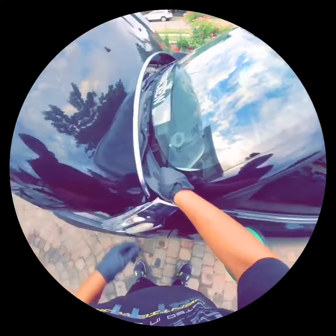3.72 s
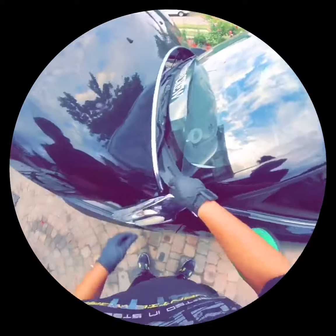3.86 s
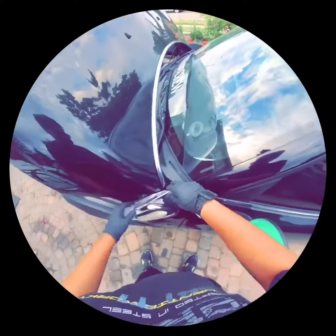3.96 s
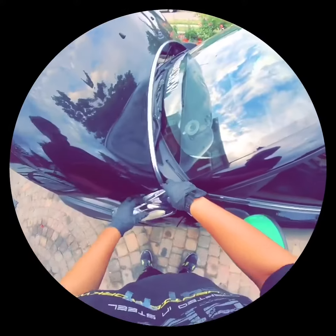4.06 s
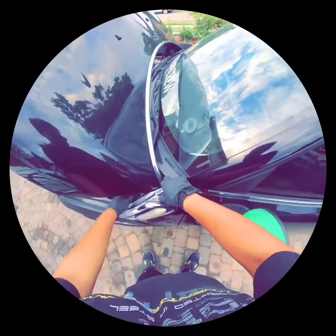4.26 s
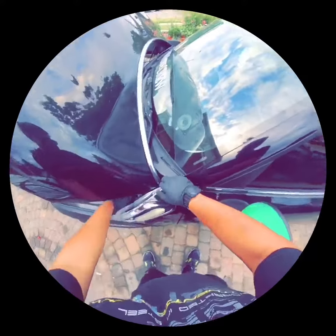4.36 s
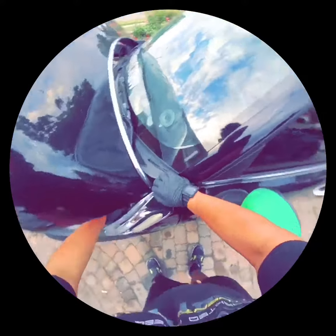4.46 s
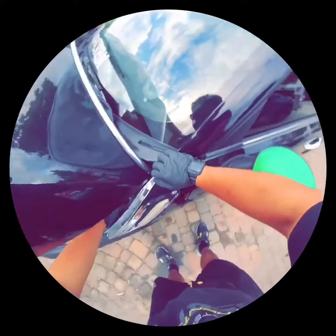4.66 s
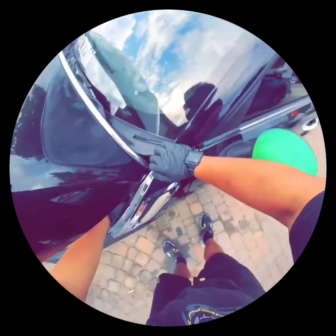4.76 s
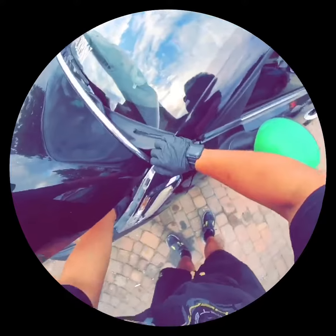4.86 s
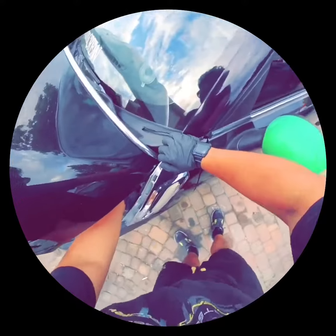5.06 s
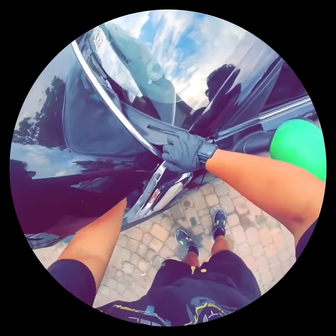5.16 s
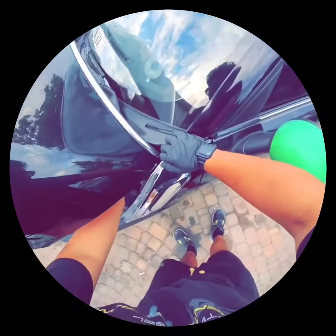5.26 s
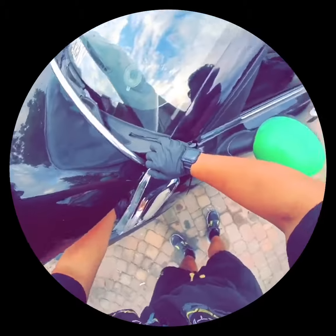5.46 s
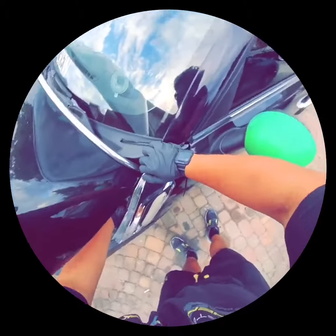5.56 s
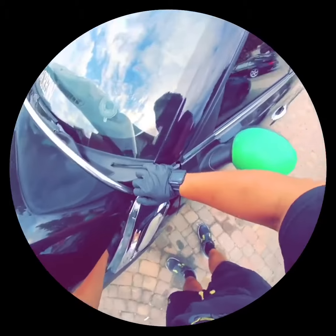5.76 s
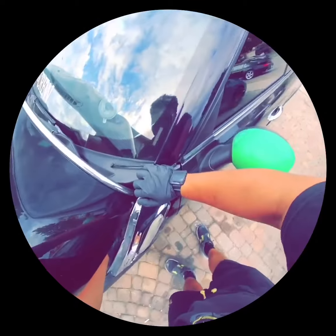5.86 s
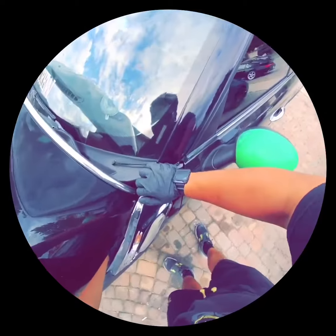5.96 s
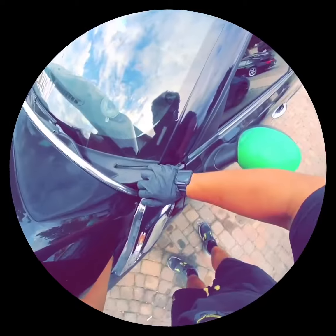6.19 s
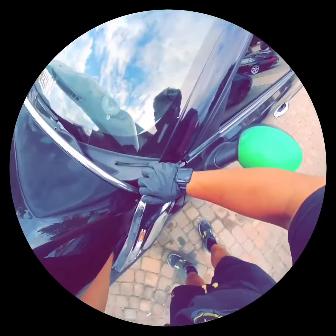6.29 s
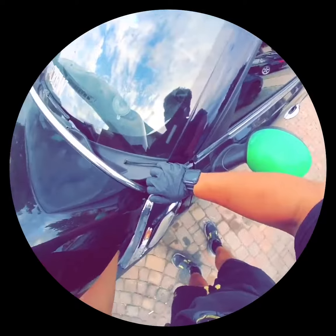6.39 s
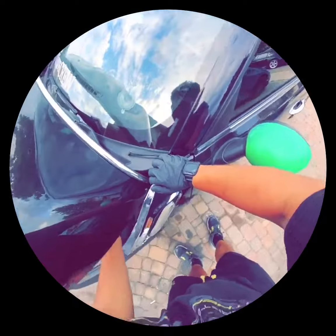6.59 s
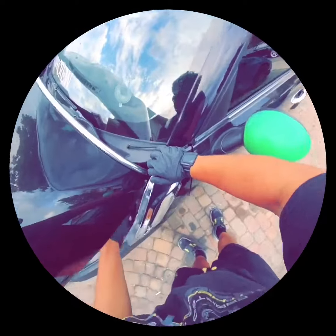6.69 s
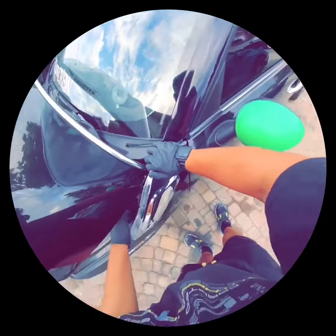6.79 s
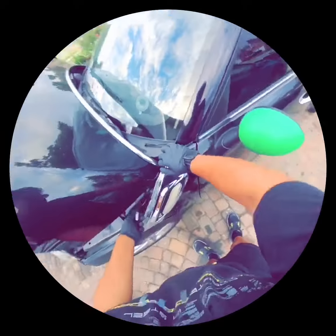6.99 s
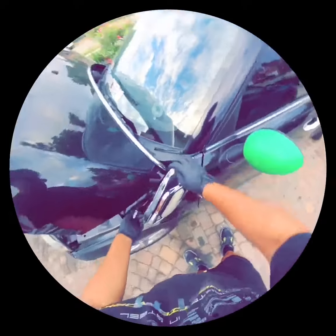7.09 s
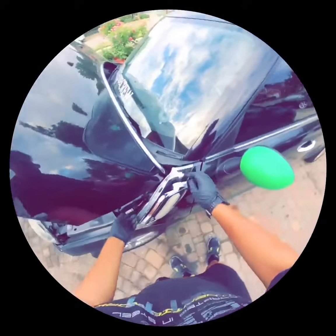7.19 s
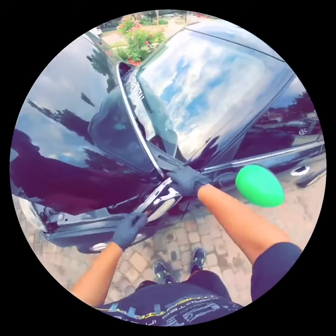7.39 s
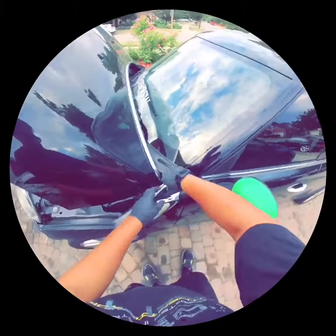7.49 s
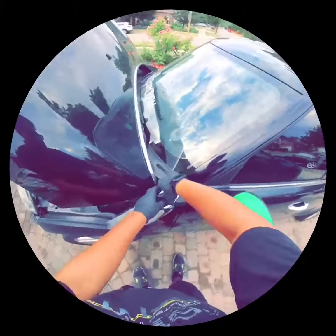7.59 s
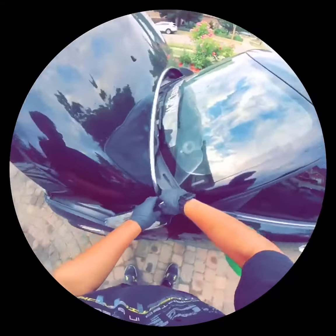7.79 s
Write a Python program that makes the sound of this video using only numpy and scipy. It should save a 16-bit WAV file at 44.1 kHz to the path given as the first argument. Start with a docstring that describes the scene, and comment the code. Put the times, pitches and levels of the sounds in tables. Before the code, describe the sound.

A fine water spray hisses outdoors for three seconds, cuts dead, then plastic car trim creaks, snaps and ticks over a faint airy rush.

```python
"""Outdoors beside a car, a fine water spray hisses for three seconds and breaks off into a moment of silence.
Then hands work plastic trim loose at the foot of the windscreen: it creaks, clips snap, the panel thumps.
Water is shaped noise and random impacts; the trim is a bank of decaying modes struck by clicks and slips.
Glove, sleeve and trim edge add friction noise; behind lie a faint hum and a rush that swells at the end.
The microphone is worn on the body; its housing cuts narrow dips."""
import sys
import numpy as np
from scipy import signal
from scipy.fft import rfft, irfft, next_fast_len
from scipy.io import wavfile

SR = 44100
rng = np.random.default_rng(int(sys.argv[2]) if len(sys.argv) > 2 else 0)


def generate_wav(sig):
    """Save sig (samples, or channels by samples) to the path in sys.argv[1] as 16-bit PCM at SR."""
    pcm = np.round(np.clip(np.atleast_2d(sig).T, -1, 1) * 32767).astype(np.int16)
    wavfile.write(sys.argv[1], SR, pcm)


N = 345289
TIME = np.arange(N) / SR
SPRAY_STOP_S, RESUME_S = 3.005, 3.147

# Water spray, before the offsets below: start_s, jet_above_edge_db, jet_below_edge_re_above_db, splash_db
SPRAY_LEVELS = [(0.0, -48.5, -1, -53), (0.08, -50, -1, -56), (0.15, -47, -1.5, -56.5),
                (0.21, -50.5, -3, -56.5), (0.26, -46, -9, -55), (0.33, -48, -3.5, -56),
                (0.45, -50, 1.5, -57.5), (0.51, -50.5, 1, -52), (0.55, -53.5, 6.5, -55.5),
                (0.7, -49.5, -3, -58), (0.76, -46, -5, -55.5), (0.83, -47.5, -2.5, -55.5),
                (0.95, -49, -4, -56), (1.1, -48.5, -2.5, -56.5), (1.25, -47.5, -5.5, -56),
                (1.35, -46.5, -7, -55), (1.72, -47, -6, -54.5), (1.8, -52, -1.5, -60), (1.91, -51, -3, -54),
                (1.97, -47, -4.5, -55.5), (2.3, -48.5, -4.5, -55.5), (2.45, -47, -3.5, -55.5),
                (2.86, -50, -1.5, -55), (2.93, -50, -1, -49.5), (2.98, -52, 2, -55)]
JET_EDGE_HZ = 4010
JET_OFFSET_DB, JET_BELOW_EDGE_OFFSET_DB = -1.5, 1.15
# Brief spurts from the nozzle: centre_s, half_length_s, jet_db, splash_db
NOZZLE_SPURTS = [(0.795, .01, -45.5, -62), (1.304, .008, -46.5, -62), (1.572, 0.0034, -42, -66),
                 (1.967, .005, -55, -48.5)]
# Fine mist off the nozzle, before its offset and sweep: start_s, level_db
MIST_LEVELS = [(0.0, -56), (0.18, -58), (0.29, -53.5), (1.16, -52.5), (1.18, -54.5), (1.68, -50),
               (1.79, -58.5), (1.84, -49), (1.86, -58), (2.05, -50)]
MIST_OFFSET_DB = -0.5
# The mist swells and fades evenly towards the end, as from a nozzle swept to and fro
SWEEP_START_S, SWEEP_PERIOD_S, SWEEP_DEPTH_DB = 2.075, 0.1676, 7.5
# The jet moves onto hollow bodywork and drums on it more strongly
DRUM_START_S, DRUM_RISE_S, DRUM_BEFORE_DB, DRUM_DB = 2.1, 0.27, -74, -64
# Spectra of splash, jet, mist and drumming: frequency_hz, density_db_per_hz
SPLASH_SPECTRUM = [(25, -53.5), (70, -30.5), (110, -13.5), (150, -8), (210, -3), (310, 1.5), (390, -0.5),
                   (500, 1.5), (1250, 3), (2000, -0.5), (2800, -18.5), (5000, -34)]
JET_SPECTRUM = [(200, -70.5), (1200, -43), (2300, -11.5), (3100, -5), (3900, -1.5), (4500, 2.5), (5200, -2),
                (6000, -10), (7000, -24), (9000, -21), (10600, -19.5), (11400, -31.5), (16000, -43)]
MIST_SPECTRUM = [(9000, -14.5), (11400, -15.5), (12100, 1), (13500, 3), (15700, 9), (17000, -17)]
DRUM_SPECTRUM = [(60, -32), (110, -20), (145, -0.5), (190, -9.5), (250, -4.5), (310, 2), (380, -8),
                 (900, -25.5), (4000, -63)]
# Borders of the bands of jet and high rush that flicker independently: border_hz
FLICKER_BORDERS_HZ = [3100, 3900, 4800]

# Modes of trim and panel, before tuning and focus: pitch_hz, level_db, t60_s
MODES = [(379, -8.5, 0.042), (437, 3, 0.042), (486, -8.5, 0.046), (723, -8.5, 0.021), (890, -13, 0.022),
         (1145, 0.5, 0.019), (1348, 1.5, .013), (1608, 2.5, 0.014), (2033, -1, 0.019), (2410, -0.5, 0.011),
         (2860, 1.5, .0047), (3240, -3, 0.011), (3590, 0, .006), (4590, 2.5, 0.013), (4830, 2.5, 0.011),
         (5280, 2.5, 0.0073), (5850, 0.5, 0.00555), (7740, 0, 0.0015), (8720, 0, 0.0046), (9180, -1, .004),
         (12480, 4.5, 0.0027), (15000, 5, .003)]
# Borders between the registers thump, panel, crack, tick and edge: border_hz
REGISTER_BORDERS_HZ = [900, 2000, 7000, 10500]
# Clips snapping, register levels before the trim's bass loss: start_s, ring_hz, ring_db, ring_t60_s,
# tuning_ratio, chatter_swell_s, chatter_re_click_db, thump_db, panel_db, crack_db, tick_db, edge_db
CLIP_SNAPS = [(3.54, 4790, -4.5, 0.09, 1.024, .001, -15, -26, -26.3, -27, -35, -44),
              (3.8158, 2954, -18, 0.0045, 1.02, 0.00067, -9, -31.5, -39, -27, -66, -58),
              (6.2633, 3790, 5.5, 0.0085, 1.203, 0.0014, -3, -42, -42, -36, -39.5, -29.5),
              (6.7672, 5350, 7, 0.014, 1.14, .001, 1, -60, -56, -41.5, -69, -69),
              (6.7862, 5530, -4, 0.0074, 1.4, 0.0018, -7, -55, -57, -34, -55, -49),
              (6.816, 5540, 2, .02, 1.2, 0.0018, -2, -59, -49, -40.5, -70, -72),
              (6.8406, 5350, 8, .016, 1.2, 0.0024, -5, -58, -57, -37.5, -57.5, -53)]
# Light taps just before and after the second snap, before the trim's bass loss:
# start_s, thump_db, panel_db, crack_db, tick_and_edge_db
LIGHT_TAPS = [(3.8141, -60, -43, -44, -88), (3.831, -39, -44, -47, -92), (3.8453, -69, -64, -64, -84),
              (3.848, -57, -49, -59, -90), (3.86, -49.5, -46, -51, -87), (3.9095, -62, -61, -66, -93)]
TAP_RATTLE_S, TAP_RING_HZ = 0.00084, 2850
# Trim slipping under the fingers, before the bass loss and the tick and edge offsets:
# start_s, swell_s, ring_hz, ring_db, thump_db, panel_db, crack_db, tick_base_db
FINGER_CREAKS = [(3.382, .003, 3300, 0, -65, -61, -69, -85), (3.482, 0.0098, 3660, -2, -66, -60, -60, -85),
                 (3.4914, 0.0029, 4800, 5, -50, -53, -55, -80), (3.513, 0.009, 4800, 3, -56, -54, -64, -85),
                 (3.533, 0.0026, 4740, 3, -43, -44.5, -40, -44),
                 (4.391, 0.0034, 3680, -3, -62, -55, -58, -87),
                 (4.486, 0.0096, 3330, 3, -62, -59.5, -56, -74),
                 (4.546, 0.0071, 3350, -6, -58.5, -58, -59.5, -67),
                 (4.749, 0.0044, 4800, -3, -60, -62, -64, -86), (4.772, .006, 3700, 0, -62, -59, -63, -76),
                 (4.822, 0.0071, 4830, 2, -59.5, -67, -61.5, -75),
                 (5.108, .01, 4800, 0, -74, -75, -62.5, -79), (5.177, 0.0027, 4400, 2, -63, -68, -57, -69),
                 (5.189, .004, 4970, -9, -62, -59, -55.5, -66),
                 (5.483, 0.0066, 4800, 2, -63, -60, -63, -72),
                 (5.548, 0.0028, 3700, -2, -58, -61, -66, -73),
                 (5.793, 0.0027, 4800, -4, -63, -65, -58, -63.5),
                 (6.105, .003, 3670, 0, -56, -56.5, -75, -86), (6.418, .012, 3700, -4, -58, -56, -53, -57),
                 (6.43, 0.0045, 3700, 0, -53, -52, -51.5, -55),
                 (6.458, 0.0034, 3700, 17, -68, -63, -50, -54),
                 (6.4698, .0015, 3700, 10, -64, -63, -50, -62),
                 (6.5, 0.0034, 5260, 8, -54.5, -49, -41, -55), (6.545, 0.0027, 3700, 0, -68, -55, -50, -70),
                 (6.554, 0.0023, 5140, 7, -59, -50, -48, -70), (6.776, 0.0032, 5370, 4, -70, -62, -49, -57),
                 (6.792, 0.0089, 5460, 0, -57, -49, -43.5, -60),
                 (6.822, .007, 5040, -6, -53.5, -56, -44, -76),
                 (6.858, 0.0036, 5000, 8, -59, -50, -44, -65), (7.096, 0.0032, 4380, 5, -67, -58, -49, -61)]
TICK_OFFSET_DB, EDGE_OFFSET_DB = -6.0, -4.5
CREAK_RING_T60_S = 0.01
# Faint shifts of the grip at random moments, cut off after 0.1 s:
# swell_s, ring_hz, ring_db, thump_db, panel_db, crack_db, tick_base_db
GRIP_SHIFT = (0.3, 4200, -3, -63, -64, -58, -85)
GRIP_SHIFTS_PER_S = 2.2
# The fingers load each mode a little differently (spread as a share of its pitch)
GRIP_DETUNE = .025
# The touched spot has a close pair of modes (lower pitch as a share of the upper)
PAIR_RATIO = 0.94
# Time that a bending wave at the pitch of the crack needs to cross the panel
TRAVEL_S, CRACK_HZ = 0.002197, 3503
# Bodywork and paving scatter lows more than highs, one entry per register: extra_db
SCATTER_TILT_DB = [7, 6.5, 0.5, -2.5, -8]
# The low scatter also lasts longest, one entry per register: t60_ratio
SCATTER_T60_RATIOS = [1.8, 1.13, 1, 1.16, 1.2]
# Trim high-pass, and the share of deep bass that it still passes on
TRIM_LOW_HZ, TRIM_BASS_DB = 277, -8.5

# The trim's edge drags over its seat and is then freed
SCRAPE_START_S, SCRAPE_END_S, SCRAPE_RAMP_S, SCRAPE_DB = 6.70, 6.862, 0.02, -51
# Spectrum of the scrape: frequency_hz, density_db_per_hz
SCRAPE_SPECTRUM = [(200, -23), (500, -7), (1150, 5), (2100, 2), (3200, -4), (4500, -1), (5400, -2),
                   (6200, -15), (7500, -18), (15000, -20)]
# Strokes of a glove on paint: peak_s, peak_db, build_up_db_per_s
GLOVE_STROKES = [(4.951, -55.5, 95), (7.12, -59, 114)]
GLOVE_LIFT_DB_PER_S = 282
# Spectrum of the glove: frequency_hz, density_db_per_hz
GLOVE_SPECTRUM = [(300, -61), (1500, -16), (4050, -10), (4500, 1.5), (4850, -2), (5500, -11.5), (7000, -22),
                  (11000, -31), (15500, -21)]
# A sleeve brushing the wing: centre_s, half_length_s, peak_db
SLEEVE_BRUSHES = [(3.288, .012, -57), (4.28, .012, -62), (4.585, .025, -67), (4.773, 0.023, -62),
                  (4.84, 0.033, -63), (5.376, 0.028, -62), (5.57, 0.017, -62)]
# Spectrum of the sleeve: frequency_hz, density_db_per_hz
SLEEVE_SPECTRUM = [(120, -26), (280, -3), (400, 3), (520, -3), (750, -5), (1100, -8), (2000, -20),
                   (5000, -31)]

# Levels of the background noise, which thins after the loud knocks, before the offsets below:
# start_s, low_rush_db, high_rush_db, air_db
RUSH_LEVELS = [(3.3, -64, -63.5, -78), (3.32, -63.5, -65.5, -80), (3.41, -62.5, -62.5, -72.5),
               (3.64, -69.5, -65, -79), (3.84, -65.5, -63, -93), (4.03, -61.5, -61, -80),
               (4.84, -66, -65, -79), (5.32, -64, -63, -77), (5.83, -66, -66, -80), (6.54, -61, -59, -75.5),
               (6.81, -61.5, -61, -77), (6.94, -57.5, -58.5, -77), (7.46, -56.5, -54, -77.5),
               (7.83, -52, -51.5, -76)]
LOW_RUSH_OFFSET_DB, HIGH_RUSH_OFFSET_DB, AIR_OFFSET_DB = -0.1, -0.67, 5.5
# Rush mirrored by the bodywork, its peak shifting as the body leans: start_s, peak_hz, level_re_high_rush_db
CAR_REFLECTION = [(3.2, 3260, -9.5), (3.75, 3100, -11), (4.05, 3390, -7), (4.25, 2995, -8),
                  (4.5, 3320, -3.5), (4.7, 3205, -17), (5.3, 3150, -11), (5.7, 3600, -4), (6.2, 3460, -12),
                  (6.85, 3695, -8), (7.02, 3630, -1), (7.25, 3400, -11), (7.55, 2900, -7), (7.8, 2750, -4)]
# Spectra of low rush, high rush, airy hiss and rumble: frequency_hz, density_db_per_hz
LOW_RUSH_SPECTRUM = [(25, -49.5), (130, -24.5), (220, -9.5), (330, -9), (410, 1), (510, 5), (620, 1.5),
                     (800, -0.5), (1200, 0.5), (1700, -5), (3000, -49), (8000, -68)]
HIGH_RUSH_SPECTRUM = [(200, -71), (1000, -34.5), (2000, 5.5), (2800, 3), (3700, 2.5), (4700, -2.5),
                      (5500, -12), (6500, -18), (10000, -31.5), (16000, -55.5)]
AIR_SPECTRUM = [(1000, -56), (3500, -22), (4900, 6.5), (5700, -5), (7000, -9), (8800, -8.5), (11200, -13),
                (12500, -7.5), (15700, -3.5)]
RUMBLE_SPECTRUM = [(25, -19), (70, -10.5), (130, -5), (180, -1), (320, 4.5), (600, -10.5), (4000, -59.5)]
RUMBLE_DB, HUM_HZ, HUM_DB = -72, 239.7, -72.8

# Narrow dips of the microphone housing: centre_hz, width_hz, depth_0_to_1
HOUSING_DIPS = [(1420, 110, 0.65), (1790, 120, 1), (2203, 74, 1), (11000, 290, 0.57)]
BASS_CUT_HZ, CUTOFF_HZ = 54, 15900


def spray():
    """Turbulence and impact noise: jet, mist and splash sputter together while droplets drum on the car."""
    jet_db, below_edge_db, splash_db = in_time(SPRAY_LEVELS)
    mist_db, = in_time(MIST_LEVELS)
    turned_away = np.sin(np.pi * (TIME - SWEEP_START_S) / SWEEP_PERIOD_S) ** 4
    mist_db = mist_db - (TIME > SWEEP_START_S) * SWEEP_DEPTH_DB * turned_away
    drum_db = np.interp(TIME, [DRUM_START_S, DRUM_START_S + DRUM_RISE_S], [DRUM_BEFORE_DB, DRUM_DB])
    sputter = .45 * drift(25) + .85 * drift(100)
    jet_spurt, splash_spurt = 0, 0
    for s, half_s, spurt_jet_db, spurt_splash_db in NOZZLE_SPURTS:
        jet_spurt = jet_spurt + from_db(spurt_jet_db) * swell(s, half_s)
        splash_spurt = splash_spurt + from_db(spurt_splash_db) * swell(s, half_s)

    water = rng.standard_normal(N) + from_db(-2.5) * droplets(per_s=3500, spread_db=1.0)
    # np.hypot adds the powers of the steady flow and the spurts
    splash_gain = np.hypot(from_db(splash_db + 0.82 * sputter), splash_spurt)
    splash = splash_gain * coloured(water, SPLASH_SPECTRUM)
    stream = flickering(coloured(water, JET_SPECTRUM), depth_db=1.4, rate_hz=22)
    lower = signal.sosfiltfilt(signal.butter(4, JET_EDGE_HZ, fs=SR, output="sos"), stream)
    upper = stream - lower
    stream = from_db(below_edge_db + JET_BELOW_EDGE_OFFSET_DB) * rms_one(lower) + rms_one(upper)
    jet = np.hypot(from_db(jet_db + JET_OFFSET_DB + 0.91 * sputter), jet_spurt) * stream
    mist = from_db(mist_db + MIST_OFFSET_DB + 2.6 * sputter) * coloured(water, MIST_SPECTRUM)
    drumming = from_db(drum_db) * coloured(droplets(per_s=3000, spread_db=2.0), DRUM_SPECTRUM)
    return splash + jet + mist + drumming


def trim():
    """Radiation of a small body: snaps, taps and creaks ring the same trim, which gives little bass."""
    ringing = (snaps() + taps() + creaks())[:N]
    bass = signal.sosfilt(signal.butter(2, 90, fs=SR, output="sos"), ringing)
    body = signal.sosfilt(signal.butter(2, TRIM_LOW_HZ, "high", fs=SR, output="sos"), ringing)
    return body + from_db(TRIM_BASS_DB) * bass


def snaps():
    """Impulsive release: each clip lets go with a click and a short chatter that excite the modes."""
    out = np.zeros(N + SR)
    for s, ring_hz, ring_db, ring_t60, tuning, chatter_s, chatter_db, *levels_db in CLIP_SNAPS:
        rings = trim_rings(ring_hz, ring_db, ring_t60, tuning, focus_db=6.0,
                           scatter_db=-12.0, scatter_t60=0.042)
        release = slips(chatter_s, per_s=6900)
        release = from_db(chatter_db) * release / (np.linalg.norm(release) + 1e-12)
        release[0] = 1  # the click itself
        add(out, s, signal.fftconvolve(rings, release[None]), levels_db)
    return out


def taps():
    """Impact excitation: light taps, each a little different, ring the modes with a tiny rattle."""
    out = np.zeros(N + SR)
    for s, thump_db, panel_db, crack_db, tick_db in LIGHT_TAPS:
        rings = trim_rings(TAP_RING_HZ, ring_db=-11, ring_t60=0.0045, tuning=1.07, focus_db=9,
                           scatter_db=-8.5, scatter_t60=.04, detune=GRIP_DETUNE)
        rattle = slips(TAP_RATTLE_S, per_s=5000)
        rattle[0] = 1  # the tap itself
        add(out, s, signal.fftconvolve(rings, rattle[None]), [thump_db, panel_db, crack_db, tick_db, tick_db])
    return out


def creaks():
    """Stick-slip friction: firm creaks, and faint shifts of the grip at random moments, excite the modes."""
    out = np.zeros(N + SR)
    shift_times = TIME[rng.random(N) < GRIP_SHIFTS_PER_S / SR]
    grip_shifts = [(s, *GRIP_SHIFT) for s in shift_times]
    for s, swell_s, ring_hz, ring_db, thump_db, panel_db, crack_db, tick_db in FINGER_CREAKS + grip_shifts:
        # the grip, and with it the panel's pitch, differs from creak to creak
        tuning = 1.15 + .1 * rng.normal()
        rings = trim_rings(ring_hz, ring_db, CREAK_RING_T60_S, tuning, focus_db=2,
                           scatter_db=-13, scatter_t60=.05, detune=GRIP_DETUNE)
        creak = signal.fftconvolve(rings, slips(swell_s, per_s=4000)[None])
        levels_db = [thump_db, panel_db, crack_db, tick_db + TICK_OFFSET_DB, tick_db + EDGE_OFFSET_DB]
        add(out, s, creak, levels_db)
    return out


def trim_rings(ring_hz, ring_db, ring_t60, tuning, focus_db, scatter_db, scatter_t60, detune=0):
    """Modal superposition: response to one click, a row per register, favouring modes near ring_hz."""
    t = TIME[:SR // 9]
    rings = np.zeros((len(REGISTER_BORDERS_HZ) + 1, len(t)))
    modes = [(hz * (1 + detune * rng.normal()), db, t60) for hz, db, t60 in MODES]
    modes += [(ring_hz, ring_db, ring_t60), (ring_hz * PAIR_RATIO, ring_db, ring_t60)]
    for k, (hz, db, t60) in enumerate(modes):
        register = np.searchsorted(REGISTER_BORDERS_HZ, hz)
        hz = hz * tuning if hz < 600 else hz  # hand pressure retunes the panel's lowest modes
        db = db + focus_db * np.exp(-(np.log(hz / ring_hz) / 0.26) ** 2)
        # bending waves are slower the lower they are, so the thump follows the crack
        delay_s = TRAVEL_S * max(np.sqrt(CRACK_HZ / hz) - 1, 0)
        age = np.maximum(t - delay_s, 0)
        amplitude = (-1) ** k * from_db(db - 60 * age / t60) / np.sqrt(t60)
        rings[register] += amplitude * np.sin(2 * np.pi * hz * age)

    # bonnet, glass and paving scatter a short tail
    tail_t60 = scatter_t60 * np.array(SCATTER_T60_RATIOS)[:, None]
    scatter = rng.standard_normal(len(t)) * from_db(-60 * t / tail_t60) * (t > .002)
    scatter = scatter / np.linalg.norm(scatter, axis=1, keepdims=True)
    tail = signal.fftconvolve(rings, scatter, axes=1)[:, :len(t)]
    return rings + from_db(scatter_db + np.array(SCATTER_TILT_DB))[:, None] * tail


def slips(swell_s, per_s):
    """Stick-slip: an uneven burst of clicks that swells and dies away, within 0.1 s."""
    t = TIME[:SR // 10] / swell_s
    clicks = rng.standard_normal(len(t)) * (rng.random(len(t)) < per_s / SR)
    return clicks * np.sqrt(t) * np.exp(-t)


def add(out, s, registers, levels_db):
    """Superposition: mixes a contact in at time s, each register's energy set as an rms over 20 ms."""
    gains = from_db(levels_db) * np.sqrt(SR / 50) / (np.linalg.norm(registers, axis=1) + 1e-12)
    out[int(s * SR):][:registers.shape[1]] += gains @ registers


def scrape():
    """Sliding friction: dense, fluctuating slips of the trim's edge during one contact."""
    since_start = TIME - SCRAPE_START_S
    until_free = SCRAPE_END_S + SCRAPE_RAMP_S - TIME
    contact = np.clip(np.minimum(since_start, until_free) / SCRAPE_RAMP_S, 0, 1)
    friction = coloured(droplets(per_s=2500, spread_db=0.5), SCRAPE_SPECTRUM)
    return contact * from_db(SCRAPE_DB + 2 * drift(110)) * friction


def glove():
    """Sliding friction: rubber drags over paint in tiny slips, building up and then lifting off."""
    strokes = 0
    for s, db, build_up in GLOVE_STROKES:
        below_peak_db = np.maximum(build_up * (s - TIME), GLOVE_LIFT_DB_PER_S * (TIME - s))
        strokes = strokes + from_db(db - below_peak_db)
    friction = coloured(droplets(per_s=3900, spread_db=-1.5), GLOVE_SPECTRUM)
    return strokes * from_db(3.4 * drift(40)) * friction


def sleeve():
    """Fibre friction: soft, dull brushes of cloth as fluttering noise."""
    strokes = sum(from_db(db) * swell(s, half_s) for s, half_s, db in SLEEVE_BRUSHES)
    return strokes * hiss(SLEEVE_SPECTRUM, flutter_db=3.5, rate_hz=69)


def outdoors():
    """Diffuse noise and a tone: a rush and its reflection off the car, airy hiss, rumble, distant motor hum."""
    low_db, high_db, air_db = in_time(RUSH_LEVELS)
    mirror_hz, mirror_db = in_time(CAR_REFLECTION)
    low = from_db(low_db + LOW_RUSH_OFFSET_DB) * hiss(LOW_RUSH_SPECTRUM, flutter_db=.7, rate_hz=15)
    # a band of independent noise stands for the reflection
    mirrored = from_db(mirror_db + 1.5 * drift(14)) * wandering_band(mirror_hz, width_hz=610)
    direct = flickering(hiss(HIGH_RUSH_SPECTRUM, flutter_db=.5, rate_hz=15), depth_db=1.1, rate_hz=6)
    high = from_db(high_db + HIGH_RUSH_OFFSET_DB) * (direct + mirrored)
    air = from_db(air_db + AIR_OFFSET_DB) * hiss(AIR_SPECTRUM, flutter_db=2.5, rate_hz=32)
    rumble = from_db(RUMBLE_DB) * hiss(RUMBLE_SPECTRUM, flutter_db=2.5, rate_hz=5)
    phase = 2 * np.pi * np.cumsum(HUM_HZ * (1 + 0.0041 * drift(2.7))) / SR
    hum = np.sqrt(2) * from_db(1.3 * drift(5)) * np.sin(phase)
    return low + high + air + rumble + from_db(HUM_DB) * hum


def wandering_band(centre_hz, width_hz):
    """Quadrature modulation: slow noise is carried up to a moving centre frequency; rms 1."""
    lowpass = signal.butter(2, width_hz / 2, fs=SR, output="sos")
    slow = signal.sosfilt(lowpass, rng.standard_normal((2, N)))
    phase = 2 * np.pi * np.cumsum(centre_hz) / SR
    return rms_one(slow[0] * np.cos(phase) + slow[1] * np.sin(phase))


def flickering(x, depth_db, rate_hz):
    """Independent band fluctuation: neighbouring bands swell and sink, the top band stays steady; rms 1."""
    out = 0
    for hz in FLICKER_BORDERS_HZ:
        band = signal.sosfiltfilt(signal.butter(5, hz, fs=SR, output="sos"), x)
        out = out + band * from_db(depth_db * drift(rate_hz))
        x = x - band
    return rms_one(out + x)


def hiss(spectrum, flutter_db, rate_hz):
    """Amplitude modulation: shaped Gaussian noise with a randomly fluttering level."""
    return coloured(rng.standard_normal(N), spectrum) * from_db(flutter_db * drift(rate_hz))


def droplets(per_s, spread_db):
    """Random impacts: clicks of either sign whose sizes spread exponentially in decibels; rms 1."""
    sizes = from_db(spread_db * np.minimum(rng.exponential(1, N), 5))
    signs = rng.choice([-1, 1], N)
    return rms_one(sizes * signs * (rng.random(N) < per_s / SR))


def coloured(x, spectrum):
    """Linear filtering: weights the Fourier components of a steady sound; rms 1."""
    size = next_fast_len(N)
    hz, db = np.transpose(spectrum)
    gain = from_db(np.interp(np.log(np.fft.rfftfreq(size, 1 / SR) + 1), np.log(hz), db))
    return rms_one(irfft(rfft(x, size) * gain, size)[:N])


def drift(rate_hz):
    """Low-pass random fluctuation: slow chance with spread 1."""
    step = 40  # samples between control points
    r = np.exp(-2 * np.pi * rate_hz * step / SR)
    noise = rng.standard_normal(N // step + 2002)
    slow = signal.lfilter([1], [1, -2 * r, r * r], noise)[2000:]  # drops the filter's onset
    return np.interp(np.arange(N) / step, np.arange(len(slow)), rms_one(slow))


def swell(s, half_s):
    """Gaussian envelope: a bell of height 1 that falls to 1/e after half_s."""
    return np.exp(-np.minimum(((TIME - s) / half_s) ** 2, 50))


def in_time(rows):
    """Linear interpolation: each column of a curve at every sample."""
    s, *columns = np.transpose(rows)
    return [np.interp(TIME, s, c) for c in columns]


def from_db(db):
    """Decibel law: amplitude ratio of a level."""
    return 10 ** (np.asarray(db) / 20)


def rms_one(x):
    """Power normalisation: scales a signal to rms 1."""
    return x / np.sqrt(np.mean(x ** 2) + 1e-20)


def scene():
    """Superposition in turn: the spray, a short silence, then the work on the trim against the background."""
    handling = trim() + scrape() + glove() + sleeve()
    wet = spray() * (TIME < SPRAY_STOP_S)
    work = (handling + outdoors()) * (TIME > RESUME_S)
    return (wet + work)[None]


def record(dry):
    """Linear filtering: the housing cuts narrow dips, deep bass is thin and the top is cut off."""
    for hz, width_hz, depth in HOUSING_DIPS:
        band = signal.lfilter(*signal.iirpeak(hz, hz / width_hz, fs=SR), dry)
        dry = dry - depth * band
    dry = signal.sosfilt(signal.butter(1, BASS_CUT_HZ, "high", fs=SR, output="sos"), dry)
    return signal.sosfilt(signal.ellip(12, .1, 80, CUTOFF_HZ, fs=SR, output="sos"), dry)


dry = scene()
out = record(dry)
generate_wav(out)
```